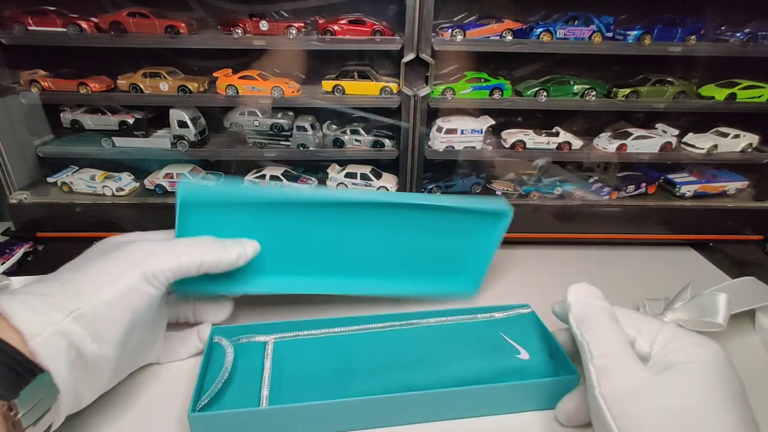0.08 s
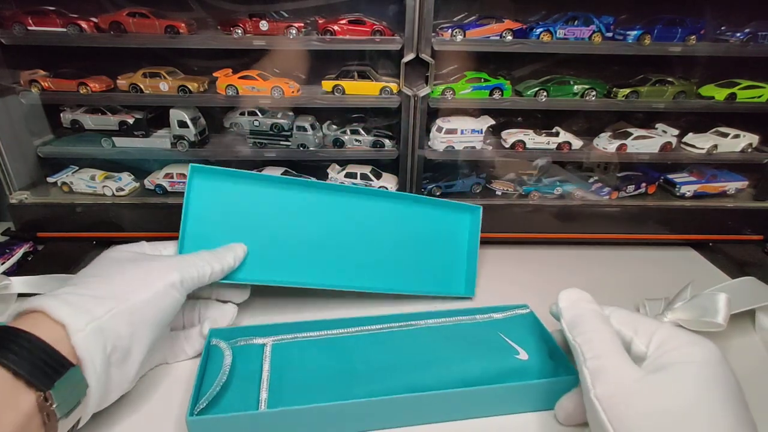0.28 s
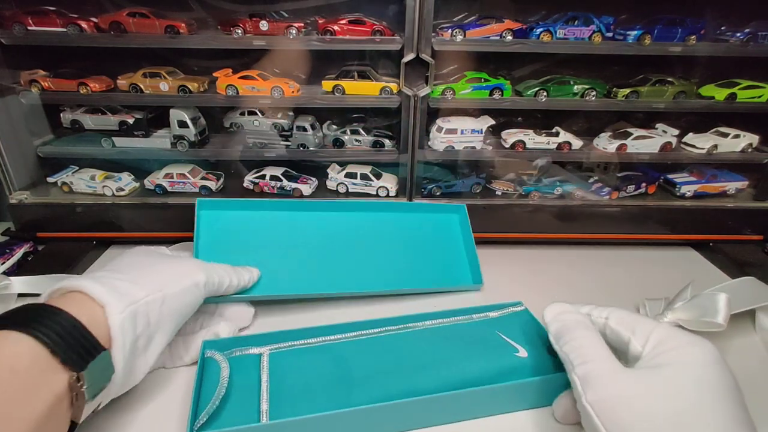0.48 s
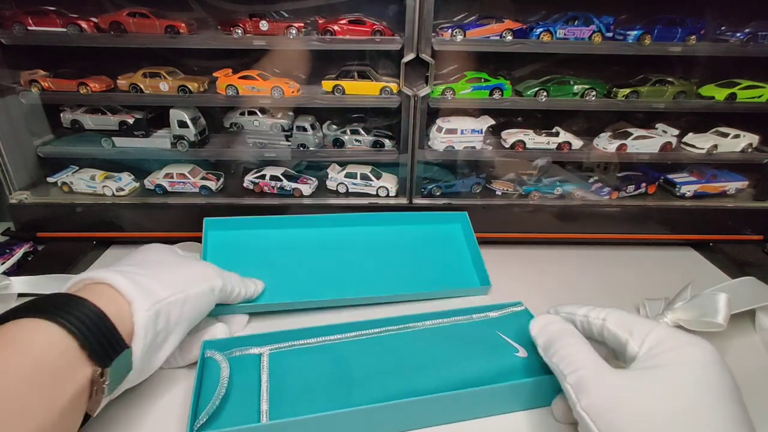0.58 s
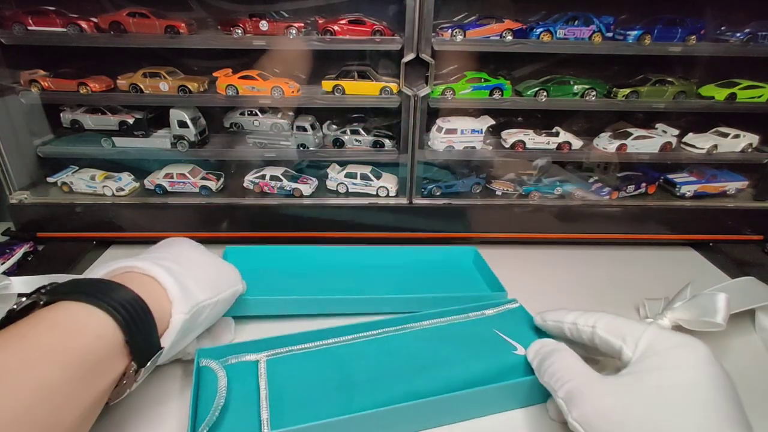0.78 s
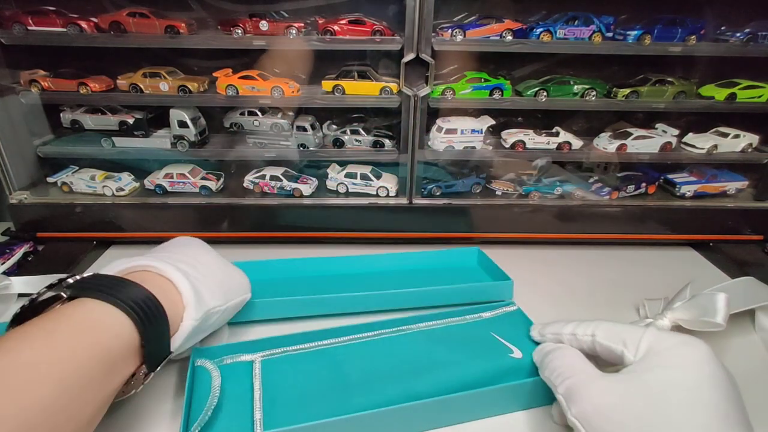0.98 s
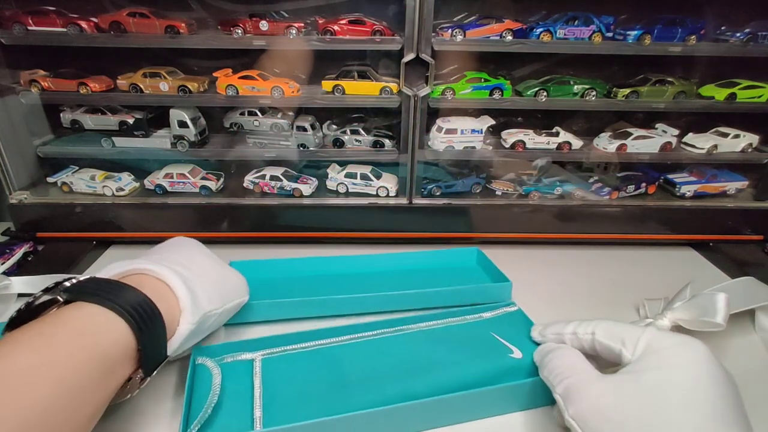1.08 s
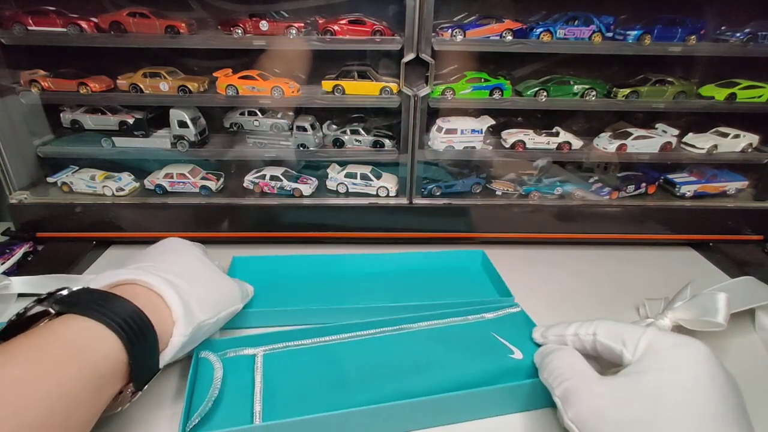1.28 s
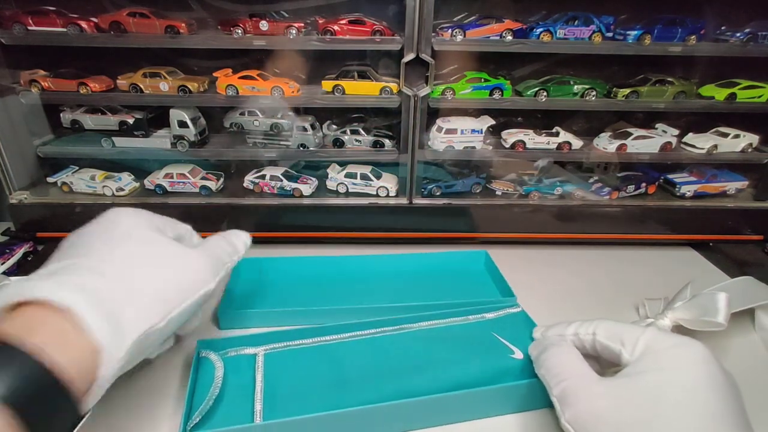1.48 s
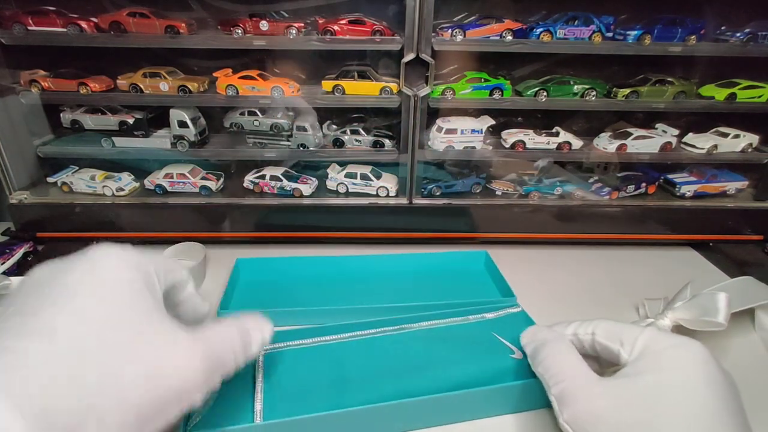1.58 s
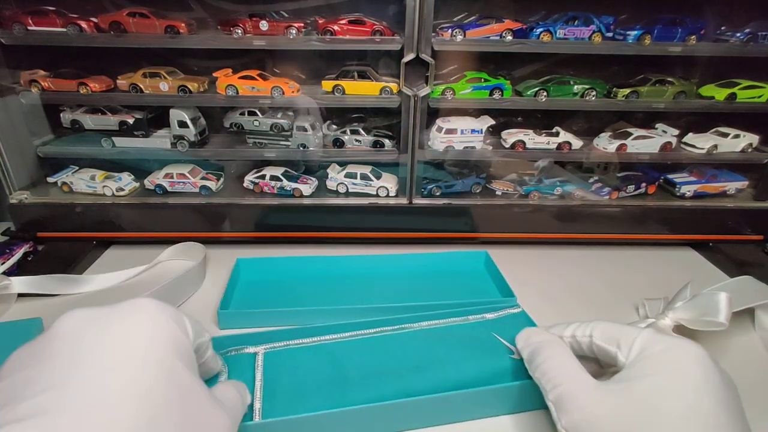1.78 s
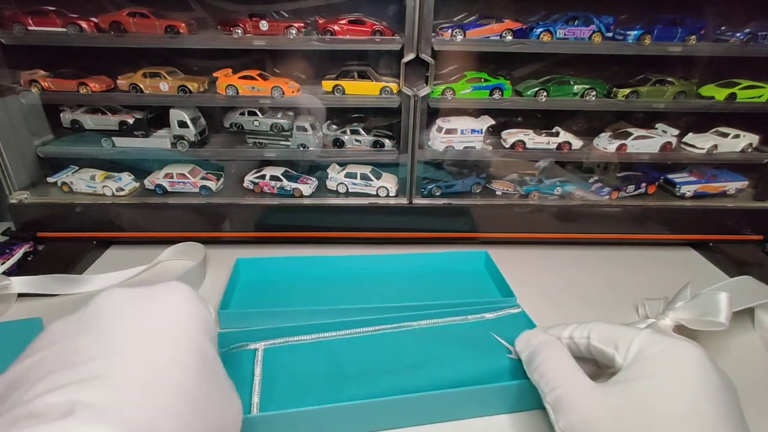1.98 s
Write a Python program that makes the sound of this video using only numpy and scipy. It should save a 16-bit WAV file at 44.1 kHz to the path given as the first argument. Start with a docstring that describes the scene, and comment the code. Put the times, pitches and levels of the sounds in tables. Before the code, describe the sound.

Cardboard lid set down on a desk by gloved hands, heard very close in a small room. Soft rubbing and a faint air puff lead to a hollow knock at 0.2 s, a sharp rim slap at 0.23 and another knock at 0.32. Weaker paired taps follow near 0.54 and 0.75, a scraping slide around 0.87, a light tap at 1.02, a small tick at 1.4, then faint rubbing from 1.8.

```python
"""In a small room, gloved hands set a cardboard lid down on a desk beside its box, close to the microphones.
The hollow lid knocks twice, its rim slapping sharply in between, then taps and slides into place.
Blows excite decaying modes, bursts of card noise and a desk thump; rubbing and sliding are trains of slips.
Cotton gloves rub over the card, its edge sings thinly, air puffs before the knocks, and a small tick follows.
Near echoes, a diffuse tail and quiet background noise surround the handling."""
import sys
import numpy as np
from scipy import signal
from scipy.fft import rfft, irfft
from scipy.io import wavfile

SR = 44100
rng = np.random.default_rng(int(sys.argv[2]) if len(sys.argv) > 2 else 0)


def log_audio(samples):
    """Write samples as a 16-bit WAV file to the path given in sys.argv[1]."""
    # one column per channel
    frames = np.atleast_2d(samples).T
    # limit to full scale, then quantise
    limited = np.clip(frames, -1, 1)
    pcm = np.round(limited * 32767).astype(np.int16)
    wavfile.write(sys.argv[1], SR, pcm)


N = 88200  # samples: two seconds


def amp(db):
    """Decibel law: 20 dB is a factor of ten in amplitude."""
    return 10 ** (np.asarray(db) / 20)


def unit(x):
    """Normalisation to an rms of 1."""
    return x / np.sqrt(np.mean(x ** 2) + 1e-20)


def read(points, hz):
    """Linear interpolation of a table on a log-frequency axis."""
    f, value = np.transpose(points)
    return np.interp(np.log(hz + 1), np.log(f + 1), value)


def level(time_s, db):
    """Amplitude envelope: gain over time, interpolated in decibels."""
    return amp(np.interp(np.arange(N) / SR, time_s, db))


def pan(lr_db):
    """Level difference between the ears: left and right gains of constant total power."""
    gains = amp(np.array([[.5], [-.5]]) * lr_db)
    return gains / np.sqrt(np.mean(gains ** 2, 0))


def add(mix, s, sound):
    """Superposition: sums a sound into the mix at time s."""
    part = mix[:, round(s * SR):][:, :sound.shape[-1]]
    part += sound[:, :part.shape[1]]


def colour(x, gain):
    """Linear filtering by a gain that depends on frequency; the result has rms 1."""
    hz = np.fft.rfftfreq(x.shape[-1], 1 / SR)
    return unit(irfft(rfft(x) * gain(hz), x.shape[-1]))


def split(x, hz):
    """Complementary crossover: the parts of a sound below and above a frequency, which sum to the whole."""
    bins_hz = np.fft.rfftfreq(x.shape[-1], 1 / SR)
    low = irfft(rfft(x) / (1 + (bins_hz / hz) ** 8), x.shape[-1])
    return low, x - low


def pair(x, likeness):
    """Coherence: mixes two unrelated signals so that they become partly alike."""
    c = np.clip(likeness, 0, 1)
    return np.array([x[0], c * x[0] + np.sqrt(1 - c * c) * x[1]])


def arch(length_s):
    """Half-sine envelope: a smooth rise and fall."""
    return np.sin(np.pi * np.arange(0, 1, 1 / (length_s * SR)))


def dying(t, t60):
    """Exponential decay, by 60 dB in t60 seconds."""
    return np.exp(-np.log(1000) * t / t60)


TILT_PIVOT_HZ = 600


def ring(modes, t, pitch=1, length=1, tilt_db=0):
    """Modal superposition: neighbouring modes start in opposite phase, so the sound swells and beats."""
    out = 0
    for k, (hz, db, t60) in enumerate(modes):
        gain = (-1) ** k * amp(db + tilt_db * np.log2(hz / TILT_PIVOT_HZ))
        out = out + gain * dying(t, t60 * length) * np.sin(2 * np.pi * hz * pitch * t)
    return out


def slips(per_s, spread_db):
    """Stick-slip friction: a dense random train of tiny slips of uneven size."""
    size = amp(spread_db * np.minimum(rng.exponential(1, (2, N)), 4))
    happens = rng.random
    sign_and_size = size * rng.standard_normal((2, N))
    return sign_and_size * (happens((2, N)) < per_s / SR)


# unequal hearing of sound from the left by the two microphones: (frequency [Hz], left-right [dB])
SIDE = [(300, -1), (2000, 8), (4000, 12), (8000, -4), (12000, 5), (16000, -12.5)]


def side(hz):
    """Frequency-dependent level difference between the two microphones."""
    return pan(read(SIDE, hz))


# room background: (frequency [Hz], spectral level [dB per Hz])
FLOOR = [(20, -3), (40, -2), (70, -4.5), (100, -10), (140, -11), (270, -17.5), (450, -23), (900, -27),
         (2600, -36.5), (8000, -39.5), (16000, -33.5)]
FLOOR_DB, FLOOR_LR_DB, FLOOR_LIKENESS = -60.5, 5.5, 1


def background():
    """Stationary noise: quiet rumble and hiss of the room, alike on both sides but stronger on the left."""
    noise = pair(rng.standard_normal((2, N)), FLOOR_LIKENESS)
    return amp(FLOOR_DB) * colour(noise, lambda hz: amp(read(FLOOR, hz))) * pan(FLOOR_LR_DB)


# echoes from the cabinet and nearby surfaces: (delay [s], level [dB])
ECHOES = [(.0062, -21.5), (0.014, -19), (0.0268, -23)]
# decay of the room: (frequency [Hz], t60 [s])
ROOM = [(130, 0.9), (450, 0.38), (1000, 0.26), (3000, .36), (8000, 0.091), (15000, 0.095)]
ROOM_DB, ROOM_ONSET_S = -15, .012


def room(x):
    """Reverberation by convolution: a few near echoes and a short diffuse tail whose decay varies with pitch."""
    noise = pair(rng.standard_normal((2, SR // 2)), likeness=0.68)
    hz, t, z = signal.stft(noise, SR, nperseg=256)
    onset = 1 - np.exp(-t / ROOM_ONSET_S)
    decay = dying(t, read(ROOM, hz)[:, None])
    tail = signal.istft(z * decay * onset, SR, nperseg=256)[1]
    # scale by the energy of the envelope in the table's second band
    energy = np.sum((dying(t, ROOM[1][1]) * onset) ** 2) * t[1] * SR
    tail *= amp(ROOM_DB) / np.sqrt(energy)
    for delay_s, db in ECHOES:
        add(tail, delay_s, amp(db) * np.ones((2, 1)))
    return signal.fftconvolve(x, tail, axes=1)[:, :N]


PUFF_S, PUFF_LENGTH_S = .142, .055
PUFF_HZ, PUFF_DB = 55.06, -46


def puff():
    """Air displacement: the falling lid pushes air ahead of it, a soft swell of low noise."""
    out, swell = np.zeros((2, N)), arch(PUFF_LENGTH_S)
    air = colour(rng.standard_normal(N), lambda hz: hz / PUFF_HZ / (1 + (hz / PUFF_HZ) ** 3))
    add(out, PUFF_S, amp(PUFF_DB) * swell * air[:len(swell)] * pan(0))
    return out


# level of the lid sliding on the desk: (time [s], level [dB])
SLIDE = [(0, -70), (.13, -62.5), (.17, -45.5), (.22, -79), (.40, -48.5), (.51, -60.5), (.60, -48.5),
         (.68, -52), (.72, -54), (.80, -48.5), (.84, -51), (.875, -41.5), (.93, -59.5), (1.0, -55),
         (1.10, -71.5), (1.27, -66), (1.35, -56), (1.43, -70), (1.73, -74.5), (1.82, -67.5), (2.0, -61)]
# resonances of the sliding lid: (frequency [Hz], half-width at half amplitude [Hz], level [dB])
SLIDE_PEAKS = [(415, 18, 2.5), (616, 250, -9.5), (880, 43, 0), (1020, 87, -7.5), (1320, 150, -8.5),
               (1503, 49, -4)]


def slide():
    """Friction-driven resonance: the lid drags over the desk and its panels resonate."""
    drive = pair(slips(per_s=5300, spread_db=2), likeness=0.39)

    def panels(hz):
        """Resonance curves of the panels, summed in power."""
        power = sum(amp(db) ** 2 / (1 + ((hz - f) / width) ** 2) ** 2 for f, width, db in SLIDE_PEAKS)
        return np.sqrt(power)

    return level(*np.transpose(SLIDE)) * colour(drive, panels) * pan(lr_db=5.0)


# the glove rubbing on card: (time [s], level [dB], treble relative to the rest [dB])
RUB = [(0, -51.5, 5.5), (0.038, -46.5, 7), (.09, -51, -0.5), (0.157, -38.5, 1), (0.192, -59, 8),
       (.27, -49.5, 3), (.38, -56, -0.5), (.45, -47, -1.5), (.51, -58.5, 0), (.61, -60, 1.5),
       (0.699, -57.5, 1), (.79, -51, 4.5), (.83, -47.5, 0.5), (0.886, -38.5, -2.5), (0.923, -51.5, -3.5),
       (.98, -47.5, 0), (1.07, -62, 1.5), (1.109, -67.5, -1), (1.18, -62, 0), (1.26, -70, -2),
       (1.34, -51, -8.5), (1.40, -66, 1), (1.471, -71.5, 2.5), (1.74, -72, 3), (1.764, -58.5, -6),
       (1.82, -49, -4.5), (1.85, -57, -4.5), (1.89, -48.5, -3), (1.929, -63, -5.5), (2.0, -46, -6)]
# colour of the rubbing: (frequency [Hz], spectral level [dB per Hz])
RUB_COLOUR = [(300, -10.5), (1000, -13.5), (1800, -7), (2600, -4.5), (3700, -0.5), (4600, -3),
              (5500, -11.5), (7500, -12.5), (10000, -22.5), (13000, -20.5), (15500, -15.5)]
RUB_SLIPS_PER_S, RUB_SPREAD_DB, RUB_LIKENESS = 8300, 2.5, 0.45
RUB_TREBLE_HZ = 5200


def glove():
    """Friction noise: cotton fibres catch on the card and hiss; some strokes are brighter than others."""
    catches = slips(RUB_SLIPS_PER_S, RUB_SPREAD_DB)
    hiss = 0.28 * rng.standard_normal((2, N))
    drive = pair(catches + hiss, RUB_LIKENESS)
    rubbing = colour(drive, lambda hz: amp(read(RUB_COLOUR, hz)) * side(hz))
    low, high = split(rubbing, RUB_TREBLE_HZ)
    time_s, db, treble_db = np.transpose(RUB)
    return level(time_s, db) * (low + high * level(time_s, treble_db))


# thin singing of the card's dragged edge: (start [s], length [s], pitch [Hz], level [dB])
SWISHES = [(0, 0.12, 2170, -61), (.24, 0.076, 3020, -50), (.868, 0.059, 3690, -43),
           (1.03, 0.094, 3200, -64), (1.13, 0.097, 3700, -64)]
SWISH_WIDTH_HZ = 170  # half-width at half amplitude


def swishes():
    """Narrow-band resonance: friction noise feeds one resonance of the card's edge."""
    out = np.zeros((2, N))
    for s, length_s, pitch_hz, db in SWISHES:
        swell = arch(length_s)
        tone = colour(rng.standard_normal(N), lambda hz: 1 / (1 + ((hz - pitch_hz) / SWISH_WIDTH_HZ) ** 2))
        add(out, s, amp(db) * swell * tone[:len(swell)] * pan(lr_db=9.5))
    return out


DESK_HZ, DESK_T60, DESK_RISE_S = 122, 0.084, 0.0033


def thump(t):
    """Single-mode response: the desk top answers a blow with one low note."""
    return (1 - np.exp(-t / DESK_RISE_S)) * dying(t, DESK_T60) * np.sin(2 * np.pi * DESK_HZ * t)


BURST_TREBLE_HZ, BURST_TREBLE_LIFE, BURST_TREBLE_DB = 6000, 0.31, 7.5  # life: ratio of decay times


def burst(t, spectrum, t60, tilt_db=0, likeness=.7):
    """High modal density: card's many short modes merge into coloured noise whose treble dies first."""
    noise = pair(rng.standard_normal((2, len(t))), likeness)

    def gain(hz):
        """Tilted spectrum, as each microphone hears it."""
        return amp(read(spectrum, hz) + tilt_db * np.log2(1 + hz / TILT_PIVOT_HZ)) * side(hz)

    low, high = split(colour(noise, gain), BURST_TREBLE_HZ)
    treble = amp(BURST_TREBLE_DB) * high * dying(t, t60 * BURST_TREBLE_LIFE)
    return low * dying(t, t60) + treble


# modes of the hollow lid, before each blow's ratios and tilt: (frequency [Hz], level [dB], t60 [s])
LID = [(330, -18, .04), (411.6, -3, .045), (493.2, -6, .045), (675.5, -16.5, 0.1), (756, -14, .035),
       (831, 2, 0.023), (896, 1, 0.025), (1054.5, -21, 0.097)]


def lid(t, pitch, length=1, tilt_db=0):
    """Free vibration of the hollow lid, with pitch and ring length set by the blow."""
    return ring(LID, t, pitch, length, tilt_db)


# modes of the stiff rim: (frequency [Hz], level [dB], t60 [s])
RIM = [(1520, -10, .03), (1645, -8, 0.035), (1970, -4, 0.032), (2050, -6.5, 0.026), (2620, -4, .04),
       (2765, -2.5, 0.033), (2860, -2.5, .045), (3140, -2, 0.025), (4116, -6.5, 0.12), (4210, 1, 0.013)]


def rim(t):
    """Free vibration of the stiff rim, each mode placed by the microphones' level difference."""
    return sum((-1) ** k * ring([mode], t) * side(mode[0]) for k, mode in enumerate(RIM))


CONTACT_S = 0.00013  # time constant


def contact(t):
    """Finite contact time: a blow builds up quickly but not instantly."""
    return 1 - np.exp(-t / CONTACT_S)


# sharp clicks of the rim: (time [s], level [dB], rim ring [dB], brightness [dB per octave], t60 [s],
# lid ring [dB], desk thump [dB], left-right [dB])
CLICKS = [(.2313, -13.5, -16, -0.3, 0.0412, -27.5, -38.5, -3.5),
          (.2375, -20.5, -22, -4, 0.026, -40, -54, -5), (1.4001, -35, -54, 4.5, 0.03, -45, -37, -1.5)]
# colour of a rim click: (frequency [Hz], spectral level [dB per Hz])
CLICK = [(200, -10.5), (800, 0), (1600, -1), (2100, -1.5), (2900, 2), (3600, -2.5), (4200, -1), (4900, -4),
         (5600, -11.5), (7000, -14.5), (10000, -24.5), (13000, -26.5), (15500, -22)]
# a blow on the rim rings the lid a little lower and brighter
CLICK_LID_PITCH, CLICK_LID_TILT_DB = .94, 7.5


def clicks(t):
    """Impact excitation of the rim: a sharp burst, the ringing of rim and lid, and a desk thump."""
    out = np.zeros((2, N))
    for s, db, rim_db, tilt_db, t60, lid_db, thump_db, lr_db in CLICKS:
        click = amp(db) * burst(t, CLICK, t60, tilt_db, likeness=0.23)
        click = click + amp(rim_db) * rim(t)
        click = click + amp(lid_db) * lid(t, CLICK_LID_PITCH, tilt_db=CLICK_LID_TILT_DB)
        add(out, s, contact(t) * click * pan(lr_db) + amp(thump_db) * thump(t))
    return out


# knocks of the lid: (time [s], level [dB], tilt [dB per octave], pitch [ratio], ring length [ratio],
# desk thump [dB], edge crack [dB], crack tilt [dB per octave], side wall [dB], panel flap [dB], left-right [dB])
KNOCKS = [(0.158, -35.5, -16, 1.28, 2.8, -53, -43, -5, -70, -37, 5),
          (0.2041, -1.5, 2, 0.99, 1.02, -19.5, -22, -1, -28.5, -28.5, -3),
          (0.3247, -3.5, 2.5, 1.0, 1.0, -20.5, -17.5, -0.5, -27, -26, 2.5),
          (0.5331, -22.5, -2, 0.93, 0.97, -35, -39, -1, -38.5, -48, 2),
          (0.5446, -22.5, 6, 1.01, 1.44, -38, -32.5, -1.5, -26, -34, 5.5),
          (.7474, -24, 5, 1.013, 0.81, -37.5, -29, -5.5, -35.5, -34, 3),
          (0.761, -31, -12.5, 0.83, 1.5, -50.5, -47, 0, -49, -33, 1),
          (0.868, -38, -9, 0.93, 1.24, -43, -34.5, -8.5, -40, -45.5, 1),
          (1.0188, -33, 11, .98, 0.92, -63.5, -53.5, -0.5, -47.5, -41, 4.5),
          (1.3610, -49, -2.5, 0.92, 1.8, -46, -60.5, -2, -49, -51.5, 4),
          (1.7590, -60.5, -6.5, 0.934, 1.2, -48.5, -56, -1.5, -62, -57.5, 7)]
# crack of the card's edge: (frequency [Hz], spectral level [dB per Hz])
CRACK = [(200, -4.5), (700, -2), (1300, 0.5), (2000, -6.5), (2800, -3), (4200, -3.5), (5400, -15),
         (7500, -25), (11000, -32), (16000, -41.5)]
CRACK_T60 = .035
# modes of the lid's narrow side walls: (frequency [Hz], level [dB], t60 [s])
WALL = [(1276, -2, .04), (1370, -4.5, 0.016), (1487, -3, .045), (1591, -1, 0.029), (2200, -10, .035)]
# slow flapping modes of the lid's broad panel: (frequency [Hz], level [dB], t60 [s])
FLAP = [(209, -8, 0.081), (295, -1, 0.061), (356, -8, .07)]


def knocks(t):
    """Impact excitation of the hollow lid: its modes, walls and panel ring, its edge cracks, the desk thumps."""
    out = np.zeros((2, N))
    for (s, db, tilt_db, pitch, length, thump_db, crack_db, crack_tilt_db,
         wall_db, flap_db, lr_db) in KNOCKS:
        body = amp(db) * lid(t, pitch, length, tilt_db)
        body = body + amp(wall_db) * ring(WALL, t) + amp(flap_db) * ring(FLAP, t)
        crack = amp(crack_db) * burst(t, CRACK, CRACK_T60, crack_tilt_db, likeness=.7)
        add(out, s, contact(t) * (body * pan(lr_db) + crack) + amp(thump_db) * thump(t))
    return out


LOW_CUT_HZ = 70


def blows():
    """Superposed impacts of lid and rim, high-passed to remove the lowest bass."""
    t = np.arange(SR // 4) / SR
    high_pass = signal.butter(2, LOW_CUT_HZ, "high", fs=SR, output="sos")
    return signal.sosfilt(high_pass, knocks(t) + clicks(t))


RIGHT_DELAY_S = .00009


def from_left(x):
    """Time difference of arrival: sound from the left reaches the right microphone a little later."""
    turn = np.exp(-2j * np.pi * np.fft.rfftfreq(N, 1 / SR) * RIGHT_DELAY_S)
    return np.array([x[0], irfft(rfft(x[1]) * turn, N)])


def scene():
    """Superposition of the handling sounds, their reverberation, the puff and the background."""
    near = from_left(blows() + glove() + slide() + swishes())
    return near + room(near) + puff() + background()


EDGE_HZ = 16100


def record(dry):
    """Band limitation: a steep linear-phase low-pass."""
    low_pass = signal.firwin(255, EDGE_HZ, window=("kaiser", 9), fs=SR)
    return signal.oaconvolve(dry, low_pass[None], "same")


dry = scene()
out = record(dry)
log_audio(out)
```